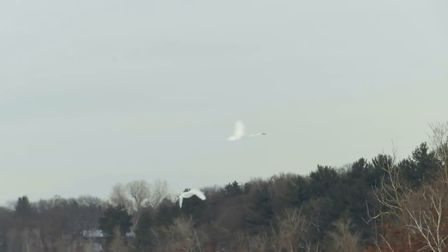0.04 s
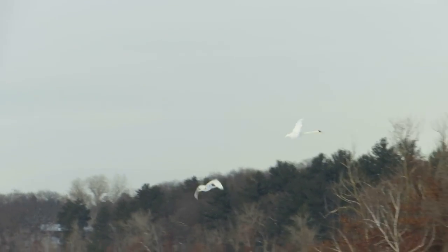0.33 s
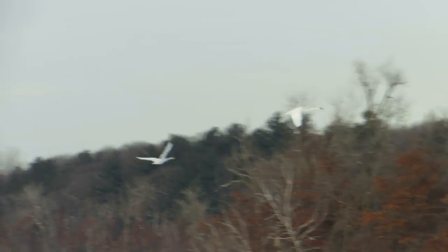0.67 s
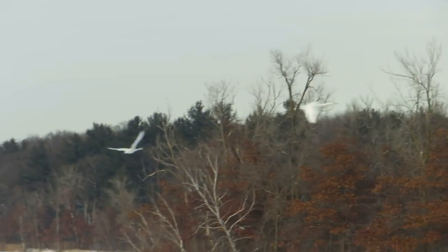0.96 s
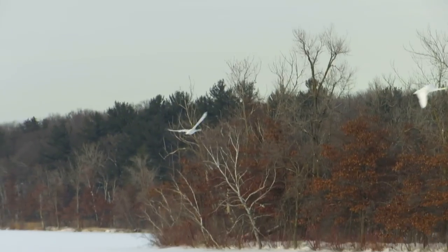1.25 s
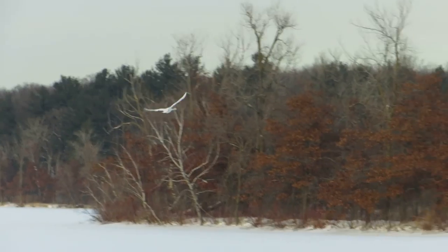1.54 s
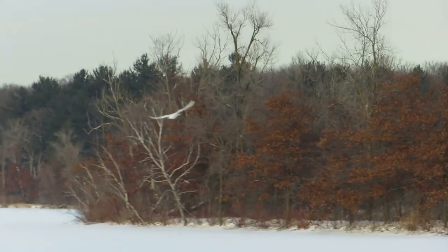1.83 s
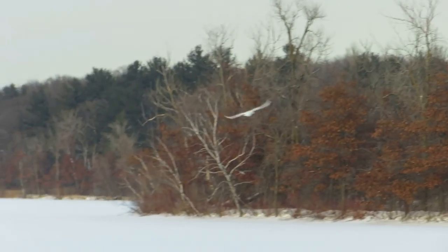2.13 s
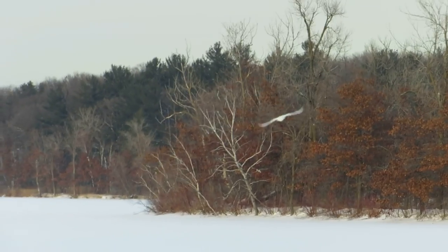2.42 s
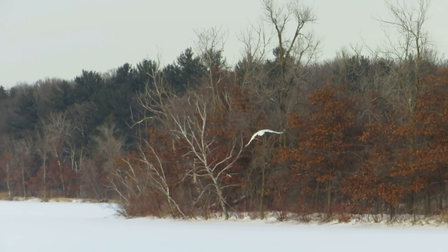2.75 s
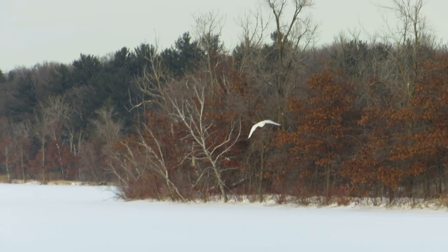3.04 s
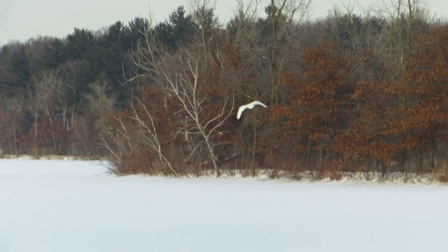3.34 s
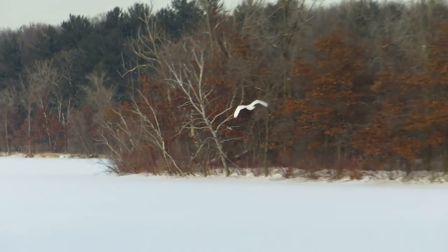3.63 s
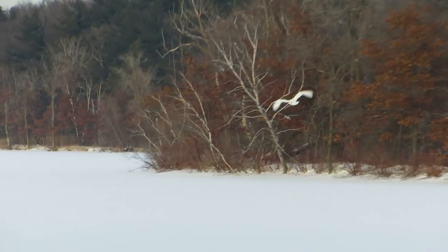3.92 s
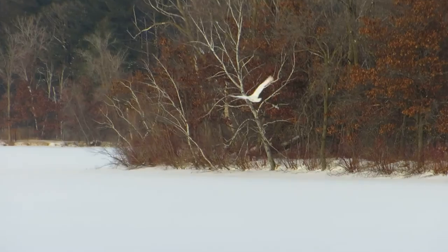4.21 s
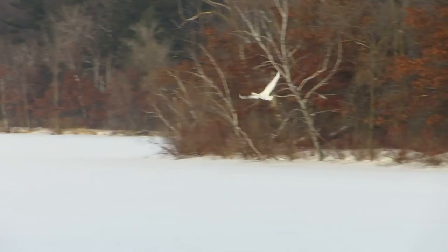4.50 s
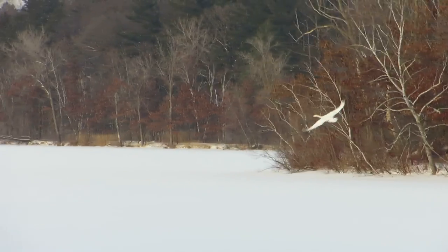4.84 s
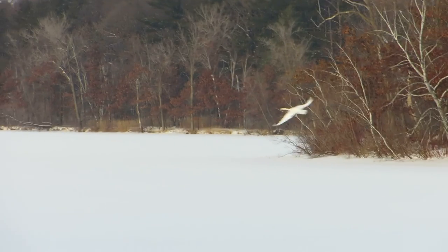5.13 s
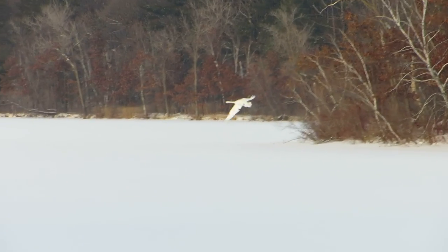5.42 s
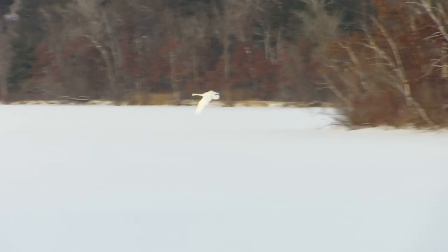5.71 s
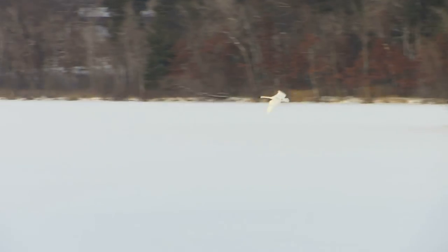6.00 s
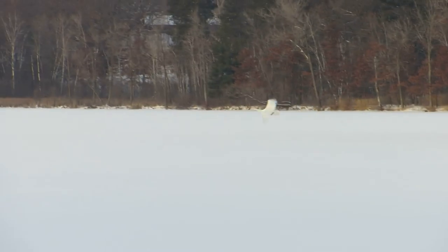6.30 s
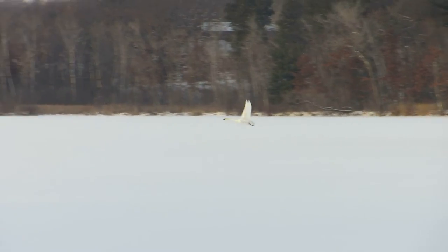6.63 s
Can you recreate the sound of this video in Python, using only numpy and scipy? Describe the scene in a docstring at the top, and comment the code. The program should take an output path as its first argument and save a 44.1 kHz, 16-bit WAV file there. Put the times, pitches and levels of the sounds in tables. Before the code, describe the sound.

Swans fly past giving short, rasping honks in irregular clusters, with soft wingbeats over faint outdoor air.

```python
"""Swans over a frozen lake

Swans fly low on a quiet winter day. Each dry, rasping honk is a pulse train filtered by the throat;
they cluster as lead-in, main honk and repeat, and a farther bird answers with a slower rattle.
Wings puff and whistle, the ice reflects the calls and the wooded shore scatters them back. Small ticks
sound nearby, a motor whirs once while the treble drops away, and faint air and a whine lie beneath."""
import sys
import numpy as np
from scipy import signal
from scipy.fft import rfft, irfft, next_fast_len
from scipy.io import wavfile

SR = 44100
rng = np.random.default_rng(int(sys.argv[2]) if len(sys.argv) > 2 else 0)


def pcm_store(signal):
    """Save signal as 16-bit PCM."""
    levels = np.round(np.clip(np.atleast_2d(signal), -1, 1) * 32767)
    wavfile.write(sys.argv[1], SR, levels.astype(np.int16).T)


N = 293706

EASY_DB = -34.5   # level of a honk of ordinary effort
# manners of honking: nominal_pulse_rate_hz, swell_db, lean_to_end_db, body_db, bite_db, fizz_db
SOFT, HARD, LOOSE = (205, 6, 3, 1.5, -4, -4.5), (190, 4.5, 1.5, -0.5, 2.5, -4), (215, 4, 0, 0, 2, -6)
BURRED, TRAILING = (325, 3, -.5, 3, 3.5, -3.5), (311, 8, -4.5, 0.5, 2.5, -6)
# main honks with their lead-in and repeat: start_s, length_s, level_db, resonance_hz, brightness_db,
# lead_in_ahead_s, lead_in_db, repeat_after_s, repeat_db
HONK_CLUSTERS = [(1.311, .027, -32, 1830, 1, 0.16, -37, 0.14, -37.5),
                 (1.7817, .035, -28.3, 1880, 2, 0.16, -35.5, 0.12, -29.5),
                 (2.338, .040, -31, 1600, -.5, 0.15, -36, 0.13, -36.5),
                 (2.8351, .038, -25.5, 1840, -0.5, 0.15, -40.5, .123, -34.3),
                 (3.283, .043, -27.7, 1670, 0, 0.14, -34.3, .130, -33.8),
                 (3.751, .041, -28, 1580, 2.5, .140, -34, .130, -34.5),
                 (5.381, .031, -29.5, 1704, 1.5, 0.14, -39.5, .115, -26.4),
                 (5.858, .037, -27, 1561, 2.5, .133, -33, .127, -32.7),
                 (6.385, .044, -24, 1828, -2, 0.15, -34, .130, -30.4)]
# weak honks between the clusters: start_s, length_s, level_db
STRAY_HONKS = [(.894, .014, -38), (.976, .017, -45.5), (2.032, .032, -38.5), (2.08, .018, -40),
               (3.043, 0.032, -43), (3.502, .027, -40), (5.103, 0.0078, -42), (5.626, .022, -35),
               (5.657, .026, -35), (6.115, .017, -40), (6.604, 0.031, -36)]


def honk_plan(break_below_db=-34, half_s=.022, catch_s=.007, stray_hz=1740):
    """Phrasing: the honks of a cluster share one resonance, and a weak repeat breaks into halves."""
    for start, length, db, hz, bright, ahead, lead_db, after, repeat_db in HONK_CLUSTERS:
        lead_s = .0265 + .0018 * (lead_db - EASY_DB)
        yield start - ahead, lead_s, lead_db, hz, bright, SOFT
        yield start, length, db, hz, bright, HARD
        if repeat_db < break_below_db:
            yield start + after, half_s, repeat_db, hz, bright, LOOSE
            yield start + after + half_s + catch_s, half_s, repeat_db - 1.5, hz, bright, TRAILING
        else:
            repeat_s = .059 - .0014 * (repeat_db - EASY_DB)
            yield start + after, repeat_s, repeat_db, hz, bright, BURRED
    for start, length, db in STRAY_HONKS:
        yield start, length, db, stray_hz, 0, LOOSE


def pulse_places(length_s, rate, edge_rate=165, jitter=.11):
    """Rate modulation: pulses, placed from 0 to 1, crowd mid-honk and are never quite even."""
    u = np.linspace(0, 1, 64)
    pulses_per_s = edge_rate + 1.2 * (rate - edge_rate) * np.sin(np.pi * u) ** 2
    cycles = np.cumsum(pulses_per_s) * length_s / len(u)
    count = max(round(cycles[-1]), 1)
    steps = np.arange(count + 1.)
    steps[1:-1] += jitter * rng.standard_normal(count - 1)
    return np.interp(steps / count, (cycles - cycles[0]) / (cycles[-1] - cycles[0]), u)


# response of the throat to one pulse: frequency_hz, gain_db
THROAT_RESPONSE = [(170, -14), (240, -4), (330, -1.05), (450, -4), (700, -2), (1000, 0.5), (1400, -4),
                   (2000, -8.5), (2600, -6), (3400, -15), (4400, -11), (5200, -9.5), (6500, -12),
                   (9000, -33.5)]


def honks(resonance_db=12, width_hz=350, wander=.029, uneven_db=1.8, ripple_db=3,
          upper_from_hz=4900, upper_to_hz=3100, upper_db=7.5, gap_db=6.5):
    """Source and filter: each pulse briefly rings the throat's resonances, a little differently."""
    out, hz = np.zeros((2, N)), np.fft.rfftfreq(1024, 1 / SR)
    knots = np.geomspace(500, 12000, 34)
    throat = at_hz(THROAT_RESPONSE, hz) + at_hz([(60, -22), (170, 0), (9000, 0), (15000, -12)], hz)
    for start, length, db, centre, bright, (rate, swell, lean, body, bite, fizz) in honk_plan():
        effort = db - EASY_DB   # effort thins the voice: less body and fizz beside the resonance
        colour = throat + at_hz([(950, body - effort), (1900, .0034), (3000, bite + bright),
                                 (5500, fizz + bright - .65 * effort)], hz)
        # the small upper resonances differ from honk to honk
        variation = rng.standard_normal(len(knots)) * np.minimum(knots / 2500, 1.2)
        colour += 2.5 * np.interp(hz, knots, variation)
        span = round(length * SR)
        call = np.zeros(span + 2 * len(hz))
        for u in pulse_places(length, rate):
            peaks = resonance_db * hump(hz, centre * (1 + wander * rng.normal()), width_hz)
            # an upper resonance sinks through the honk, with a dark gap above it
            upper = upper_from_hz + (upper_to_hz - upper_from_hz) * u
            peaks += upper_db * hump(hz, upper, width_hz) - gap_db * hump(hz, 1.16 * upper, 2 * width_hz)
            ripple = ripple_db * np.interp(hz, knots, rng.standard_normal(len(knots)))
            force = from_db(lean * (2 * u - 1) - swell * (2 * u - 1) ** 2 + uneven_db * rng.normal())
            pulse = force * impulse_response(colour + peaks + ripple)
            call[int(u * span):int(u * span) + len(pulse)] += pulse
        call *= from_db(db) * np.sqrt((span + .011 * SR) / np.sum(call ** 2))
        add(out, start - .0003, placed(-call, pan=-4))
    return out


def dispersed(x, hz, width_hz):
    """Dispersion: an all-pass delays the band around hz, so a pulse builds over a swing or two."""
    radius = np.exp(-np.pi * width_hz / SR)
    poles = [1, -2 * radius * np.cos(2 * np.pi * hz / SR), radius ** 2]
    return signal.lfilter(poles[::-1], poles, x + 1e-18)


# calls of the farther bird: start_s, end_s, level_db
FAR_RATTLES = [(0.933, 0.974, -40), (1.277, 1.306, -47), (1.505, 1.546, -42.5), (1.832, 1.866, -42),
               (2.219, 2.252, -45), (2.432, 2.461, -47), (2.748, 2.801, -44.5), (3.09, 3.142, -43),
               (3.223, 3.277, -46), (3.53, 3.58, -41.5), (3.945, 4.009, -42.5), (4.369, 4.528, -44),
               (4.836, 4.989, -44.2), (5.278, 5.37, -43), (5.825, 5.854, -45), (5.91, 5.95, -44),
               (6.06, 6.112, -42), (6.441, 6.497, -42)]


def rattles(rate_hz=87, low_hz=1350, high_hz=2020, chirp_s=.008, sag=.11, wander=.051, uneven_db=1.5):
    """A slow pulse train is heard as a rattle: rough, rising chirps that swell, sink and fade."""
    out, u = np.zeros(N), np.linspace(0, 1, int(chirp_s * SR))
    for start, end, db in FAR_RATTLES:
        span = int((end - start) * SR)
        call = np.zeros(span + len(u))
        for place in np.linspace(0, 1, max(round((end - start) * rate_hz), 2) + 1):
            pitch = (low_hz + (high_hz - low_hz) * u) * (1 + sag * (.5 - place) + wander * rng.normal())
            rasp = .29 * noise_band(len(u), 1100, 2600)
            chirp = (np.sin(2 * np.pi * np.cumsum(pitch) / SR) + rasp) * np.sin(np.pi * u) ** 2
            force = (.86 + np.sin(np.pi * place)) * from_db(uneven_db * rng.normal())
            call[int(place * span):int(place * span) + len(u)] += force * chirp
        add(out, start - chirp_s / 2, from_db(db) * rms_one(call))
    return placed(out, pan=-4)


# puffs of air from the wings: centre_s, half_width_s, noise_db, corner_hz, thump_db
WING_PUFFS = [(0.295, .032, -51.5, 600, -54), (0.352, 0.016, -43.5, 2400, -64),
              (0.428, 0.028, -39, 480, -45), (0.577, .033, -41.5, 300, -44.5),
              (.712, .027, -36.5, 430, -43.5), (4.818, .033, -46, 500, -65)]


def wing_puffs(lowest_hz=150, thump_hz=140):
    """Air displacement: a wing pushes a soft lump of dull noise with a sinking thump under it."""
    out, t = np.zeros(N), np.arange(N) / SR
    for centre, width, db, corner, thump_db in WING_PUFFS:
        noise = cut(rng.standard_normal(N), corner, "low", order=1)
        noise = cut(noise, lowest_hz, "high", order=4)
        noise = rms_one(cut(noise, 2700, "low", order=1))
        pitch = thump_hz * (1 - .25 * np.tanh((t - centre) / width))
        thump = np.sqrt(2) * np.sin(2 * np.pi * (np.cumsum(pitch) / SR + rng.random()))
        envelope = np.exp(-2 * ((t - centre) / width) ** 2)
        out += (from_db(db) * noise + from_db(thump_db) * thump) * envelope
    return placed(out, pan=0)


# whistling wingbeats: centre_s
WINGBEATS = [3.56, 4.02, 4.33, 4.68, 5.05]


def wing_whistles(pitch_hz=2100, width_hz=240, half_width_s=.072, first_db=-46.5, fade_db_per_s=5):
    """Aeolian sound: air sings through the flight feathers, fainter as the bird draws away."""
    out, t = np.zeros(N), np.arange(N) / SR
    tone = noise_band(N, pitch_hz - width_hz / 2, pitch_hz + width_hz / 2)
    for centre in WINGBEATS:
        db = first_db - fade_db_per_s * (centre - WINGBEATS[0])
        out += from_db(db) * tone * np.exp(-((t - centre) / half_width_s) ** 2)
    return placed(out, pan=0)


# a far bird's peep: start_s, length_s, level_db, from_hz, to_hz
FAR_PEEP = (0.4, 0.02, -44.5, 1270, 1500)


def peep():
    """Frequency glide: a nearly pure tone starts quickly and fades as it rises."""
    start, length, db, from_hz, to_hz = FAR_PEEP
    out, u = np.zeros(N), np.linspace(0, 1, int(length * SR))
    tone = np.sin(2 * np.pi * np.cumsum(from_hz + (to_hz - from_hz) * u) / SR)
    add(out, start, from_db(db) * tone * np.sin(np.pi * np.sqrt(u)))
    return out


def ice_reflection(x, delay_s=.0031, gain_db=-15):
    """Specular reflection: a weaker, duller copy glances off the ice a moment later."""
    out = np.zeros((2, N))
    add(out, delay_s, from_db(gain_db) * cut(x, 5300, "low", order=1))
    return out


# colour of the shore's answer: frequency_hz, gain_db
SHORE_RESPONSE = [(150, -33), (600, -22), (1200, -7.5), (1800, -2.5), (2600, -2), (3200, -15), (8000, -21)]


def shore_echo(x, t60_s=1.1, build_s=.0096):
    """Diffuse scattering: countless trunks return a thin, midrange tail, unlike in each ear."""
    t, size = np.arange(2 * SR) / SR, next_fast_len(N + 2 * SR)
    tail = rng.standard_normal((2, len(t))) * from_db(-60 * t / t60_s) * (1 - np.exp(-t / build_s))
    tail /= np.sqrt(np.sum(tail ** 2, axis=1, keepdims=True))
    tail = tail + .52 * tail[::-1]   # the ears share part of it
    colour = from_db(at_hz(SHORE_RESPONSE, np.fft.rfftfreq(size, 1 / SR)) - 14)
    return irfft(rfft(x, size) * rfft(tail, size) * colour, size)[:, :N]


# small ticks nearby: start_s, strength_db, pitch_hz
NEAR_TICKS = [(.069, -28.5, 1250), (.701, -33, 5000), (.713, -27, 5060), (.958, -21, 1970),
              (2.607, -24.5, 6900), (3.037, -25.5, 3370), (3.216, -30, 3600), (3.984, -31.5, 4190),
              (4.459, -33.5, 4030), (4.942, -35, 2800), (5.423, -27.5, 8000)]


def ticks(t60_cycles=35, full_crack_hz=3500, crack_s=.0015):
    """Damped oscillation: a tiny crack with a short ring; low ticks are rounder."""
    out, t = np.zeros(N), np.arange(SR // 10) / SR
    for start, db, hz in NEAR_TICKS:
        ring = np.sin(2 * np.pi * hz * t) * from_db(-60 * t * hz / t60_cycles)
        crack = noise_band(len(t), hz / 2, min(2 * hz, SR / 3)) * np.exp(-t / crack_s)
        add(out, start, from_db(db) * (.68 * ring + .69 * min(hz / full_crack_hz, 1) * crack))
    return placed(out, pan=-2.5)


# close tones of the motor's whir: pitch_hz, relative_db
WHIR_TONES = [(3900, -15.5), (4350, -5), (4540, -4), (5050, -18), (5600, -12.5)]


def motor(on_s=3.548, off_s=4.205, ramp_s=.0082, level_db=-56, width_hz=80, kick_db=17, kick_s=.024):
    """Gear noise: a small lens motor whirs in narrow bands inside a hiss that rasps as it starts."""
    whir = sum(from_db(db) * noise_band((2, N), hz - width_hz / 2, hz + width_hz / 2)
               for hz, db in WHIR_TONES)
    gears = from_db(-5) * noise_band((2, N), 3700, 5900, order=4)
    kick = from_db(kick_db * gate(on_s, on_s + kick_s, ramp_s))
    return gate(on_s, off_s, ramp_s) * from_db(level_db) * (whir + kick * gears)


def treble_dip(x, from_s=3.578, to_s=4.282, ramp_s=.014, corner_hz=2680, leak_db=-19.5):
    """Low-pass filtering: the treble drops away for about as long as the motor runs."""
    muted = gate(from_s, to_s, ramp_s)
    dull = cut(x, corner_hz, "low", order=12) + from_db(leak_db) * cut(x, 9000, "low")
    return (1 - muted) * x + muted * dull


# spectrum of the air over the lake: frequency_hz, relative_density_db
AIR_SPECTRUM = [(25, -18), (45, 1.5), (65, -2), (95, -8.5), (160, -6), (300, -8.5), (450, -14.9),
                (750, -7.5), (1300, -7), (2100, -11.5), (2900, -16.5), (5500, -22), (10000, -28),
                (15000, -35.3)]
# left-right likeness of the air noise: frequency_hz, correlation
AIR_CORRELATION = [(40, -0.17), (120, 0.3), (400, -0.61), (1200, -0.28), (3000, -0.21), (8000, -0.24),
                   (14000, -0.23)]


def air_band(low_hz, high_hz):
    """Partial coherence: shared and opposed noise mix in one band; the shared part has unit rms."""
    hz = np.fft.rfftfreq(N, 1 / SR) + 1e-3
    mid, side = rfft(rng.standard_normal((2, N)))
    alike = np.clip(at_hz(AIR_CORRELATION, hz), -.95, .95)
    side *= np.sqrt((1 - alike) / (1 + alike))
    roll_off = np.sqrt((1 + (low_hz / hz) ** 12) * (1 + (hz / high_hz) ** 12))
    gain = from_db(at_hz(AIR_SPECTRUM, hz)) / roll_off
    noise = irfft(gain * np.array([mid + side, mid - side]), N)
    return noise / noise.mean(0).std()


# course of the air noise: time_s, rush_db, hiss_db
AIR_LEVELS = [(0, -55.5, -57), (.25, -55.5, -57), (.48, -50.5, -53), (1.05, -52.5, -55), (1.3, -48, -53),
              (1.7, -48.5, -52), (2.1, -51.3, -56.5), (3.2, -50.5, -56), (4.25, -54, -57.5),
              (5.15, -54, -57.5), (5.6, -49, -52.8), (6.33, -53.5, -55), (6.66, -50.5, -55.5)]


def air(rumble_db=-57):
    """Ambient noise: a steady distant rumble under a slowly varying rush and hiss."""
    times, *levels = np.transpose(AIR_LEVELS)
    rush, hiss = (from_db(np.interp(np.arange(N) / SR, times, db)) for db in levels)
    rumble = from_db(rumble_db) * air_band(30, 260)
    return rumble + rush * air_band(256, 2180) + hiss * air_band(2420, 14200)


def specks(per_s=10, spread_db=3, decay_s=.0023):
    """Shot noise: very faint dry ticks at random times, each ear hearing its own share."""
    sizes = from_db(-46 + spread_db * np.clip(rng.standard_normal(N), -2, 2))
    impulses = sizes * (rng.random(N) < per_s / SR)
    envelope = signal.lfilter([1], [1, -np.exp(-1 / (decay_s * SR))], impulses + 1e-18)
    return cut(envelope * rng.standard_normal((2, N)), [2500, 11000], "band", order=1)


# thin electronic whine: pitch_hz, rms_db
WHINE_TONES = [(15734, -70.5)]


def whine():
    """Pure tone: a steady electronic oscillation near the upper limit of hearing."""
    t = np.arange(N) / SR
    return sum(np.sqrt(2) * from_db(db) * np.sin(2 * np.pi * hz * t) for hz, db in WHINE_TONES)


def placed(x, pan, shadow_hz=800, left_lag_s=.00005):
    """Diffraction: bass bends round evenly, treble favours the right if pan < 0; the left ear lags."""
    n, bass = np.arange(len(x)), cut(x, shadow_hz, "low", order=1)
    gains = from_db([[.71 * pan], [-.71 * pan]])
    left, right = bass + (x - bass) * gains / gains.mean()
    return np.array([np.interp(n - left_lag_s * SR, n, left), right])


def impulse_response(spectrum_db):
    """Minimum phase: the causal response to a click of a body with this spectrum."""
    cepstrum = irfft(np.log(from_db(spectrum_db)))
    half = len(cepstrum) // 2
    cepstrum[1:half] *= 2
    cepstrum[half + 1:] = 0
    return irfft(np.exp(rfft(cepstrum)))


def hump(hz, centre, half_width):
    """Lorentzian resonance curve, 1 on top."""
    return 1 / (1 + ((hz - centre) / half_width) ** 2)


def at_hz(points, hz):
    """Interpolation of a spectrum on a log-frequency axis."""
    frequencies, values = np.transpose(points)
    return np.interp(np.log(hz + 1e-9), np.log(frequencies), values)


def cut(x, hz, kind, order=2):
    """Butterworth filter."""
    return signal.sosfilt(signal.butter(order, hz, kind, fs=SR, output="sos"), x + 1e-18)


def noise_band(shape, low_hz, high_hz, order=2):
    """Band-limited noise of unit rms."""
    return rms_one(cut(rng.standard_normal(shape), [low_hz, high_hz], "band", order))


def gate(from_s, to_s, ramp_s):
    """Trapezoidal window: 1 between two times and 0 outside."""
    t = np.arange(N) / SR
    return np.clip(.5 + np.minimum(t - from_s, to_s - t) / ramp_s, 0, 1)


def from_db(db):
    """Decibels to amplitude ratio."""
    return 10 ** (np.asarray(db) / 20)


def rms_one(x):
    """Normalisation to unit rms."""
    return x / np.sqrt(np.mean(x ** 2) + 1e-20)


def add(out, start_s, sound):
    """Superposition: mix a sound in from start_s."""
    i = max(round(start_s * SR), 0)
    out[..., i:i + sound.shape[-1]] += sound[..., :N - i]


def scene():
    """Multipath propagation: honks come straight, glance off the ice and return from the shore."""
    near = dispersed(honks(), hz=2100, width_hz=2000)
    near = dispersed(near, hz=996, width_hz=900)
    birds = near + rattles() + wing_whistles() + peep() + ice_reflection(near)
    lake = birds + shore_echo(birds) + wing_puffs() + air() + specks()
    return treble_dip(lake) + ticks() + motor() + whine()


def record(dry, cutoff_hz=15950):
    """Band limiting: a steep elliptic low-pass removes the highest treble."""
    return signal.sosfilt(signal.ellip(12, .1, 80, cutoff_hz, fs=SR, output="sos"), dry)


dry = scene()
out = record(dry)
pcm_store(out)
```